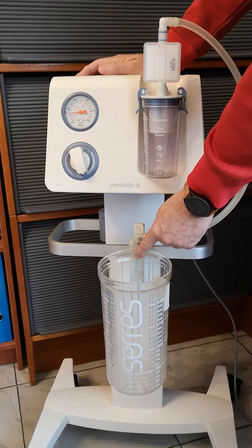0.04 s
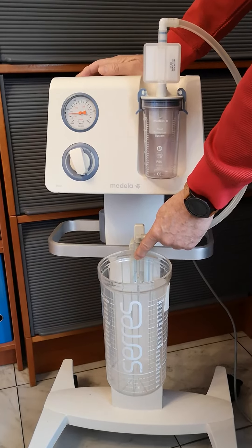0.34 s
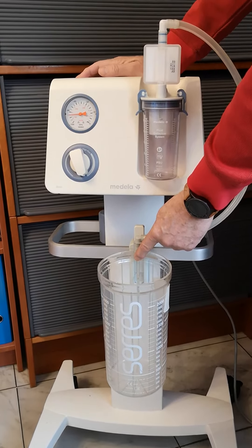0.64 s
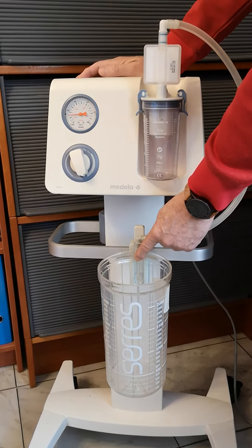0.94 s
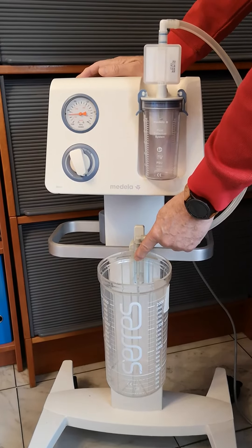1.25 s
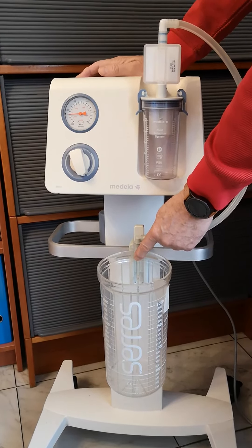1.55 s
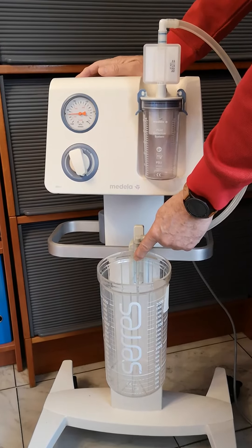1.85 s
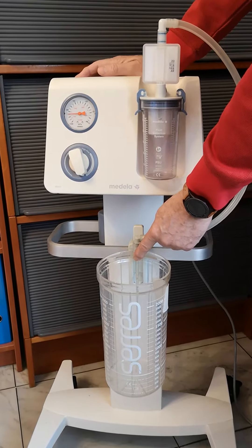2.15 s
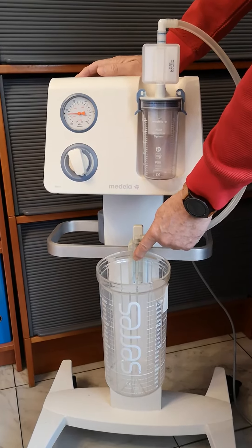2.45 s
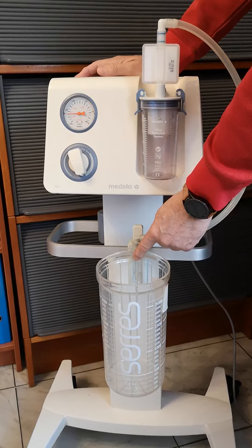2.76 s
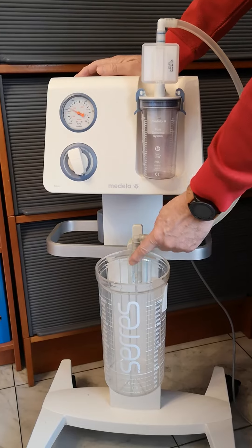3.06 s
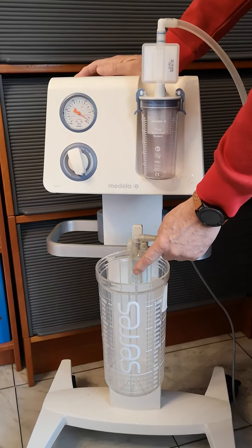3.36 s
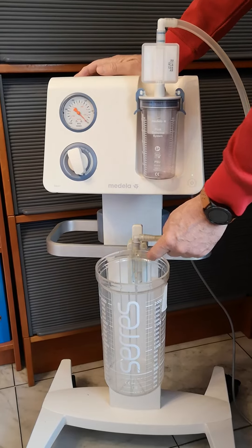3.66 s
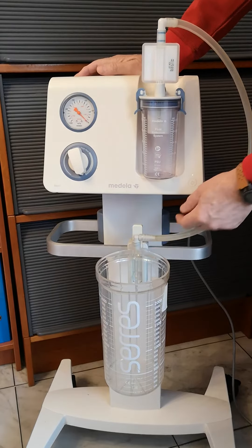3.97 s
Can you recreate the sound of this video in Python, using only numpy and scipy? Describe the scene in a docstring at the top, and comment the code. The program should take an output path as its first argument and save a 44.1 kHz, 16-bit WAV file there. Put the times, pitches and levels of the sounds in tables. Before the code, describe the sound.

Air hisses suddenly into a suction canister as a finger uncovers its port, then quickly dulls and dies. Before and after, the unit hums quietly nearby in a small room, with faint puffs and low handling rumble.

```python
"""Suction unit, vacuum release

A medical suction unit hums quietly in a small room while a finger seals the canister port.
A soft puff comes once a second, with low handling rumbles and one light tap. The finger peels off:
air leaks, spits, then bursts in as a turbulent jet that rings the port and the plastic canister.
The hiss dies away, treble first, as the vacuum is spent."""
import sys
import numpy as np
from scipy import signal
from scipy.fft import rfft, irfft
from scipy.io import wavfile

SR = 44100
rng = np.random.default_rng(int(sys.argv[2]) if len(sys.argv) > 2 else 0)


def master_out(mix):
    """Clip the mix to full scale and print it as 16-bit PCM to the path in sys.argv[1]."""
    frames = np.transpose(np.atleast_2d(mix))
    ceiling = np.clip(frames, -1, 1)
    pcm = np.round(ceiling * 32767).astype(np.int16)
    wavfile.write(sys.argv[1], SR, pcm)


N = 176400
T = np.arange(N) / SR
HZ = np.fft.rfftfreq(N, 1 / SR)

OPEN_S, SPENT_S, OPEN_RAMP_S = 3.1295, 3.5373, .0012
VACUUM = np.clip((SPENT_S - T) / (SPENT_S - OPEN_S), 0, 1)

# Jet spectrum (frequency [Hz], relative density [dB])
JET_SPECTRUM = [(20, -16.5), (40, 2), (75, -11), (170, -27.5), (260, -22.5), (400, -38), (700, -29),
                (950, -17.5), (1150, -21), (1550, -4), (2150, -7.5), (2800, 0.5), (3450, -6), (4400, -2.5),
                (6000, 1), (6900, -5), (7800, -3), (8700, -3.5), (9900, -7), (11200, -19), (12200, -10),
                (13700, -16.5), (14800, -18), (15200, -42)]
# Band amplitude = vacuum ** exponent (frequency [Hz], exponent [-])
JET_DECAY = [(60, 1.6), (300, 0.48), (1200, 0.43), (2700, 1.34), (5000, 1.345), (8000, 1.63), (14000, 1.45)]
# Port, tube and canister resonances (frequency [Hz], width [Hz], left lift [dB], right lift [dB])
CANISTER_MODES = [(1535, 130, 1.5, 2.5), (1980, 60, 4.5, 4.5), (2320, 90, 7, 3), (2393, 110, 1, 11),
                  (2727, 100, 2.5, 8.5), (2926, 50, 8, 11), (3033, 50, 11, 8.5), (3295, 50, 3, 10.5),
                  (3655, 210, 1.5, 8.5), (4150, 66, 1.5, 7.5), (4884, 110, 4.5, 8.5), (5900, 100, 6.5, 3),
                  (6317, 45, 8, 5.5), (7343, 55, 5.5, 4.5), (7410, 74, 8.5, 5), (7700, 40, 4.5, 9),
                  (7900, 60, 11.5, 6), (8390, 60, 8.5, 1), (10707, 45, 7, 9), (11660, 110, 7.5, 1)]
# Jet stereo balance (frequency [Hz], left minus right [dB])
JET_BALANCE = [(0, 2), (400, -1.5), (750, 4), (1150, -3.5), (1900, -1), (2600, -4), (4200, -3.5),
               (5100, 3.5), (6300, 0), (7400, 13), (8300, 8), (9400, 9), (10400, -7), (11400, -3.5),
               (14500, -6)]
# Jet stereo phase (frequency [Hz], left lead [rad])
JET_LEAD = [(0, 0), (400, 0), (1500, 1), (4000, 1.5), (5800, 3.6), (8100, 7.5), (12000, 12), (15000, 12.9)]


def inrush():
    """A turbulent jet, driven by the falling vacuum, rings the port and canister."""
    surge_db = 3.2 * np.exp(-((T - 3.203) / .008) ** 2)  # finger clears the port
    burst_db = 10 * np.exp(-np.maximum(T - OPEN_S, 0) / .009)  # first narrow gap: more treble
    opening = np.clip((T - OPEN_S) / OPEN_RAMP_S + .5, 0, 1) * amp(surge_db)
    spectrum_db = curve(JET_SPECTRUM)
    turbulence = rfft(unit_rms(noise(spectrum_db) + .55 * diffuse(spectrum_db)))
    centres_hz = [hz for hz, _ in JET_DECAY]
    jet = np.zeros((2, N))
    for (hz, exponent), weights in zip(JET_DECAY, np.eye(len(JET_DECAY))):
        band = irfft(turbulence * curve(list(zip(centres_hz, weights))), N)
        flutter_db = 1.5 * wander(rate_hz=61.3)
        jet += band * VACUUM ** exponent * amp(flutter_db + (burst_db if hz > 6000 else 0))
    ringing = rfft(jet * opening) * resonances(CANISTER_MODES)
    lead = np.exp(1j * np.array([[.5], [-.5]]) * curve(JET_LEAD))
    return amp(-21.5) * irfft(ringing * pan(curve(JET_BALANCE)) * lead, N)


# Canister air modes (frequency at opening [Hz], half-width per filter stage [Hz], level [dB])
CAVITY_MODES = [(288, 28, -53), (925, 65, -48.5)]


def cavity(rise=.11, attack_s=.009):
    """The jet blows the canister's hollow tones, which rise as it fills with air."""
    out = np.zeros(N)
    for hz, half_width_hz, db in CAVITY_MODES:
        glide_hz = hz * (1 + rise * (1 - VACUUM))
        tone = rng.standard_normal(N)
        for _ in range(2):
            tone = resonate(tone, glide_hz, 2 * half_width_hz)
        out += amp(db) * unit_rms(tone)
    return out * VACUUM ** .7 * np.clip((T - OPEN_S) / attack_s, 0, 1)


# Spit spectrum (frequency [Hz], relative density [dB])
SPIT_SPECTRUM = [(2000, -40), (5500, -18), (7000, -2), (8000, 0.5), (10000, -3), (11500, -13),
                 (13500, -6.5), (15000, -14)]


def spit():
    """Air cracks through the first slit as the seal breaks."""
    return amp(-17) * decay(OPEN_S, fall_s=.003) * noise(curve(SPIT_SPECTRUM))


# Leak spectrum (frequency [Hz], relative density [dB])
LEAK_SPECTRUM = [(800, -39), (1700, -28), (2600, -6), (3600, -11.5), (4500, 5.5), (5900, -12), (7600, -9),
                 (9500, -24), (15000, -27.5)]


def leak(start_s=3.086, attack_s=.009, swell_db_per_s=810):
    """A thin hiss swells under the lifting finger until the seal gives way."""
    swell = amp(-25.5 - swell_db_per_s * np.maximum(OPEN_S - T, 0))
    parting = np.clip((T - start_s) / attack_s, 0, 1)
    cutoff = np.clip((OPEN_S - T) / OPEN_RAMP_S, 0, 1)
    return diffuse(curve(LEAK_SPECTRUM)) * swell * parting * cutoff


# Puffs (peak time [s], drive level [dB], tilt above 1 kHz [dB/octave])
PUFFS = [(0.841, -62.5, -1), (1.845, -66, -5.5), (2.843, -63.5, -2.5), (3.84, -68, -6)]
# Puff spectrum (frequency [Hz], relative density [dB])
PUFF_SPECTRUM = [(500, -24.5), (1000, -14), (1400, -9), (1650, -12), (2100, -5), (2750, 1), (3300, -8),
                 (4600, -9), (8000, -19.5), (15000, -37)]
# Housing resonances (frequency [Hz], width [Hz], left lift [dB], right lift [dB])
HOUSING_MODES = [(1440, 90, 4, 14), (1980, 70, 13, 12.5), (2450, 330, 2, 7.5), (3580, 130, 10.5, 12.5),
                 (4190, 110, -2, -0.5), (5260, 120, 10, 2.5)]


def puffs(rise_s=.012, fall_s=.03):
    """Soft puffs ring the housing, alternately brighter and duller."""
    out = np.zeros((2, N))
    octaves = np.log2(np.maximum(HZ / 1000, 1))
    for peak_s, db, tilt in PUFFS:
        sigma_s = np.where(T < peak_s, rise_s, fall_s)
        envelope = np.exp(-((T - peak_s) / sigma_s) ** 2 / 2)
        out += amp(db) * envelope * diffuse(curve(PUFF_SPECTRUM) + tilt * octaves)
    return irfft(rfft(out) * resonances(HOUSING_MODES), N)


# Tap spectrum (frequency [Hz], relative density [dB])
TAP_SPECTRUM = [(300, -14), (700, -11), (1200, 0), (2300, -5), (4000, -22), (7000, -33)]


def tap():
    """One dull, light tap on the casing."""
    return amp(-58) * decay(start_s=1.929, fall_s=.0077) * diffuse(curve(TAP_SPECTRUM))


# Motor tones (frequency [Hz], level [dB], left minus right [dB], left lead [rad])
MOTOR_TONES = [(31.2, -72, 0, 0), (37.6, -73, 0, 0), (43, -69, 0, 0), (67, -80, 0, 0), (90.7, -67.5, 0, 0),
               (100, -81, 0, 0), (115.3, -80, 0, 0), (120.2, -72.5, 0, 0), (150, -81, 0, 0),
               (262.5, -86, 0, 0), (937, -89, 0, 2.9), (1050, -95, -7, 1.6), (1166, -89, -10, 0),
               (2030, -95, -5, 0), (10729, -107, -10, 0)]
# Air and motor noise (frequency [Hz], relative density [dB])
PUMP_SPECTRUM = [(15, -9.5), (27, -7.5), (31, 10), (44, 8.5), (50, 0.5), (80, -0.5), (110, -5), (180, -10),
                 (300, -13.5), (550, -24), (1300, -19), (2000, -16), (2700, -17.5), (3300, -23.5),
                 (5500, -28.5), (8600, -34), (15500, -39)]


def pump(drift=.0012, waver_db=.98):
    """Slightly wavering motor tones over a steady wash of air."""
    out = amp(-65.5) * diffuse(curve(PUMP_SPECTRUM))
    for hz, db, balance_db, lead_rad in MOTOR_TONES:
        cycles = np.cumsum(hz * (1 + drift * wander(rate_hz=2.5))) / SR + rng.random()
        tone = np.sqrt(2) * np.sin(2 * np.pi * cycles + np.array([[lead_rad], [0]]))
        out += pan(balance_db) * amp(db + waver_db * wander(rate_hz=4)) * tone
    return out


# Rumbles (peak time [s], 1/e half-length [s], level [dB], centre [Hz])
RUMBLES = [(1.474, 0.087, -52, 38.6), (1.72, 0.36, -57.5, 38.8), (1.606, 0.34, -74.5, 168),
           (2.683, 0.19, -63, 41.4), (3.22, .08, -52, 40), (3.47, .07, -53.5, 39.5),
           (3.776, 0.044, -71, 350), (3.899, 0.14, -68.5, 205)]


def handling(q=2.3):
    """Soft low swells as the hands and sleeve shift."""
    out = np.zeros((2, N))
    for peak_s, half_s, db, hz in RUMBLES:
        detuning = (HZ + 1) / hz - hz / (HZ + 1)
        spectrum_db = -20 * np.log10(1 + (q * detuning) ** 2)
        out += amp(db) * np.exp(-((T - peak_s) / half_s) ** 2) * diffuse(spectrum_db)
    return out


# Pitch dips (start [s], end [s])
WHINE_DIPS = [(.06, .26), (1.35, 1.52), (2.62, 2.85)]


def whine(high_hz=8027, low_hz=7752):
    """A faint, thin whine that drops in pitch now and then."""
    dipped = sum((T > start_s) & (T < end_s) for start_s, end_s in WHINE_DIPS)
    cycles = np.cumsum(np.where(dipped, low_hz, high_hz)) / SR
    return pan(14.5) * amp(-101) * np.sqrt(2) * np.sin(2 * np.pi * cycles)


# Room decay (frequency [Hz], T60 [s])
ROOM_T60 = [(100, 0.2), (1500, 0.25), (4000, 0.23), (8000, 0.23), (15000, .2)]


def room(x, direct_db=-3.5, wet_db=-6, delay_s=.003):
    """Direct sound plus the dense, short reflections of a small room."""
    slot = 20  # samples per reflection
    count = SR // 2 // slot
    arrivals = np.arange(count) * slot + rng.integers(0, slot, (2, count)) + int(delay_s * SR)
    reflections = np.zeros((2, SR))
    np.put_along_axis(reflections, arrivals, rng.choice([-1., 1.], arrivals.shape), 1)
    hz, t, frames = signal.stft(reflections, SR, nperseg=256)
    t60_s = curve(ROOM_T60, hz)[:, None]
    tail = signal.istft(frames * amp(-60 * t / t60_s) / np.sqrt(t60_s), SR, nperseg=256)[1]
    tail = irfft(cohere(rfft(tail, N)), N)[:, :SR]
    wet = signal.fftconvolve(x, tail / np.linalg.norm(tail[0]), axes=1)[:, :N]
    return amp(direct_db) * x + amp(wet_db) * wet


# Left-right coherence of diffuse sound (frequency [Hz], coherence [0-1])
COHERENCE = [(40, .9998), (90, .988), (170, .9), (330, .72), (650, .2), (1200, .1), (15000, .05)]


def cohere(pair):
    """Makes two independent spectra alike in the bass, as at two close microphones."""
    coherence = curve(COHERENCE)
    mid = np.sqrt((1 + coherence) / 2) * pair[0]
    side = np.sqrt((1 - coherence) / 2) * pair[1]
    return np.array([mid + side, mid - side])


def diffuse(spectrum_db):
    """Shaped stereo noise, rms 1."""
    return unit_rms(irfft(cohere(rfft(rng.standard_normal((2, N)))) * amp(spectrum_db), N))


def noise(spectrum_db):
    """Shaped mono noise, rms 1."""
    return unit_rms(irfft(rfft(rng.standard_normal(N)) * amp(spectrum_db), N))


def wander(rate_hz):
    """Low-passed random motion, rms 1."""
    t = T[::20]
    hz = np.fft.rfftfreq(len(t), t[1])
    spectrum = rfft(rng.standard_normal(len(t))) / (1 + (hz / rate_hz) ** 2)
    return np.interp(T, t, unit_rms(irfft(spectrum, len(t))))


def resonances(modes):
    """Stereo response of resonant peaks; minimum phase, so they ring only after being driven."""
    gain = amp(sum(np.array([[left_db], [right_db]]) / (1 + (2 * (HZ - hz) / width_hz) ** 2)
                   for hz, width_hz, left_db, right_db in modes))
    log_gain = np.log(np.hstack([gain, gain[:, -2:0:-1]]))
    phase_rad = -signal.hilbert(log_gain).imag[:, :len(HZ)]
    return gain * np.exp(1j * phase_rad)


def resonate(x, hz, width_hz):
    """Unity-gain resonator that follows the curve hz."""
    carrier = np.exp(2j * np.pi * np.cumsum(hz) / SR)
    pole = np.exp(-np.pi * width_hz / SR)
    return 2 * (carrier * signal.lfilter([1 - pole], [1, -pole], x / carrier)).real


def decay(start_s, fall_s):
    """Instant onset, exponential fall."""
    return (T > start_s) * np.exp(-np.maximum(T - start_s, 0) / fall_s)


def curve(points, hz=HZ):
    """Interpolates a table over log frequency."""
    knots_hz, values = np.transpose(points)
    return np.interp(np.log(hz + 1), np.log(knots_hz + 1), values)


def pan(balance_db):
    """Stereo gains for a left-minus-right level."""
    return amp(np.array([[.5], [-.5]]) * balance_db)


def amp(db):
    """Decibels to gain."""
    return 10 ** (np.asarray(db) / 20)


def unit_rms(x):
    """Scales to rms 1."""
    return x / np.sqrt(np.mean(x ** 2) + 1e-30)


def scene():
    """Release, puffs and tap in the room, over the running unit and handling rumble."""
    release = inrush() + cavity() + leak() + spit()
    return room(release + puffs() + tap()) + pump() + handling() + whine()


def record(dry, cutoff_hz=15520):
    """Steep low-pass."""
    lowpass = signal.firwin(511, cutoff_hz, window=("kaiser", 9), fs=SR)
    return signal.oaconvolve(dry, lowpass[None], "same")


dry = scene()
out = record(dry)
master_out(out)
```